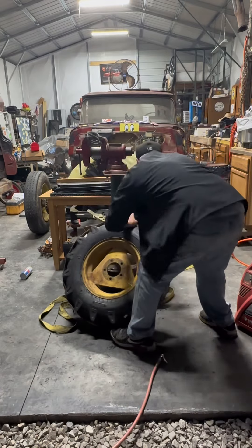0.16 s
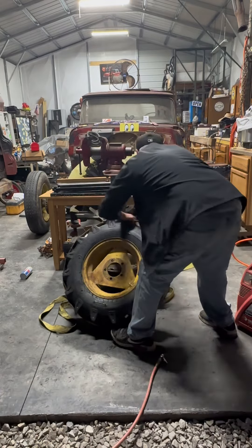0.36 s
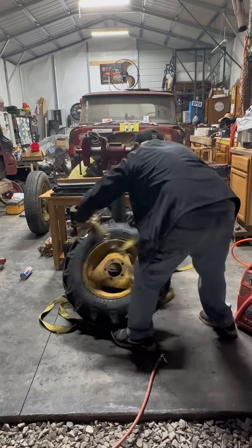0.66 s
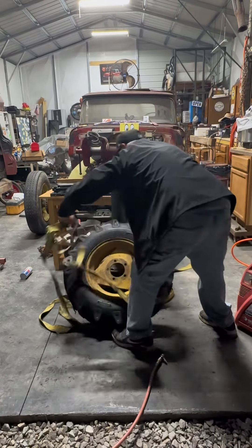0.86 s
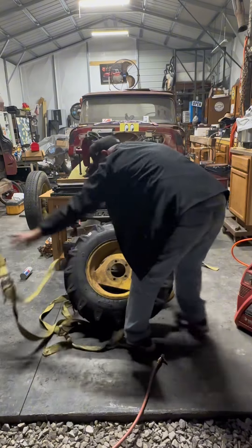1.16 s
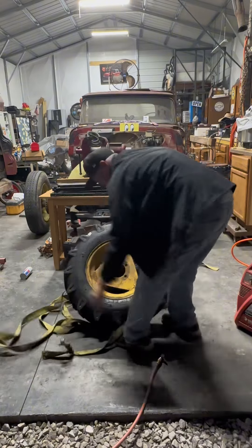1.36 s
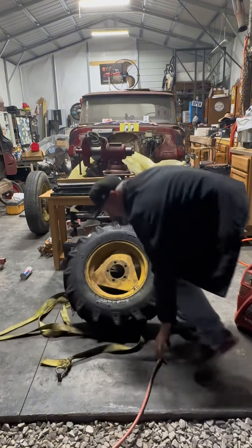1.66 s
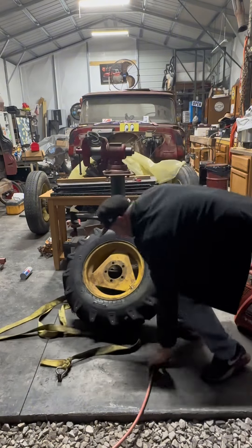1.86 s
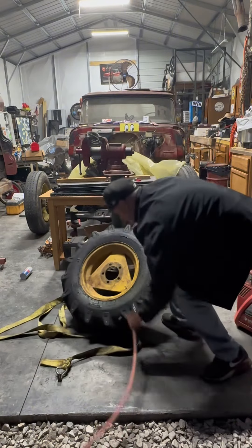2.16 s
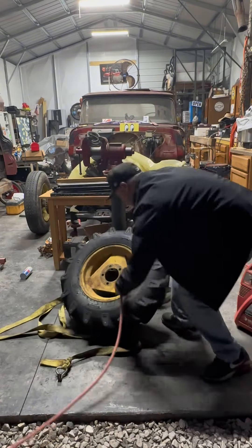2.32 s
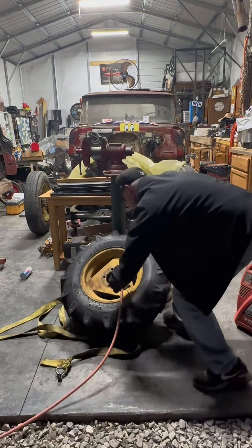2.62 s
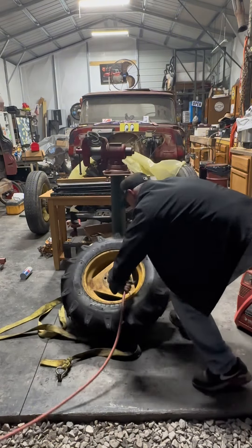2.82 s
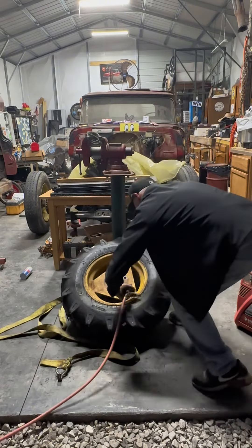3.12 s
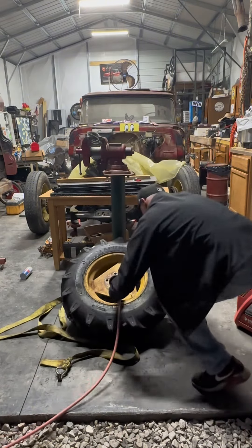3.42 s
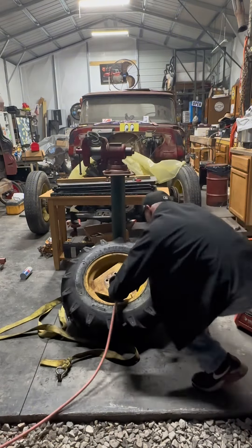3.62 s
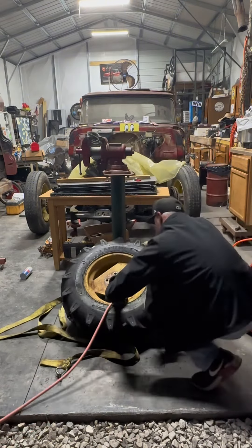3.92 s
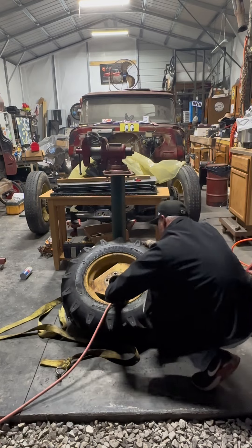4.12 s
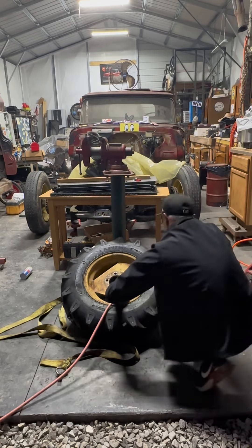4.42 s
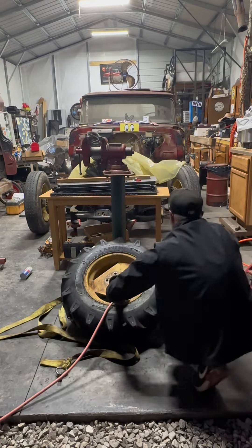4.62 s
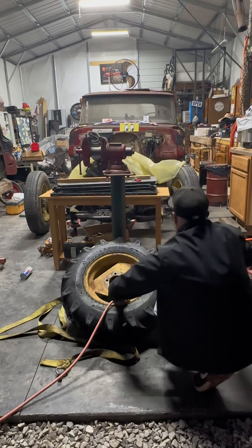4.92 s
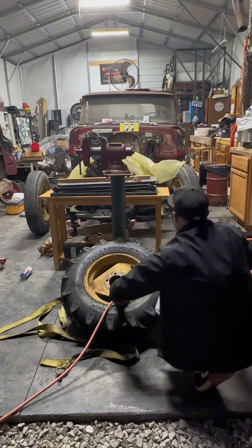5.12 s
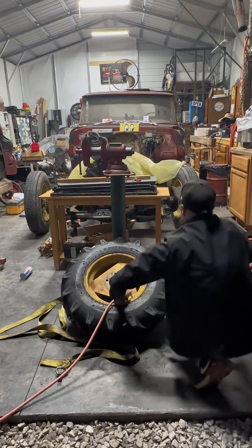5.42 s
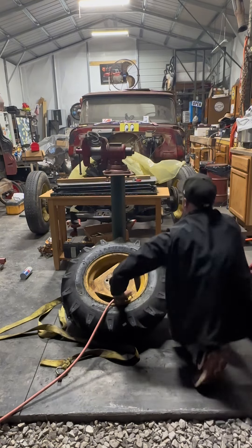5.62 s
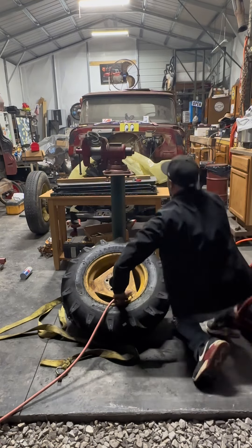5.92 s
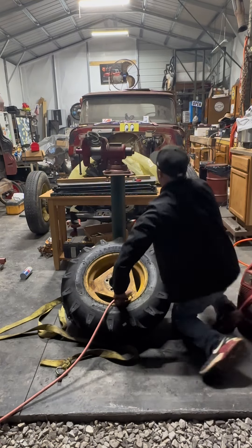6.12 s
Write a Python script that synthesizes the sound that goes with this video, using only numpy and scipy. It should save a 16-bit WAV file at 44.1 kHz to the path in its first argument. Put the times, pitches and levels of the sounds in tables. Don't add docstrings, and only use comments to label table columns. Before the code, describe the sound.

Compressed air hisses from an open hose as strap hardware clinks on concrete, then it puffs, blasts into a tractor tire and seals to near silence.

```python
import sys
import numpy as np
from scipy import signal
from scipy.fft import rfft, irfft, next_fast_len
from scipy.io import wavfile
from scipy.ndimage import uniform_filter1d

SR = 44100
rng = np.random.default_rng(int(sys.argv[2]) if len(sys.argv) > 2 else 0)


def transcribe(signal):
    frames = np.atleast_2d(signal).T
    limited = np.clip(frames, -1, 1)
    pcm = np.round(limited * 32767).astype(np.int16)
    wavfile.write(sys.argv[1], SR, pcm)


def field_ratio(decibels):
    return 10 ** (np.asarray(decibels, dtype=float) / 20)


N = 276507
T = np.arange(N) / SR
HZ = np.fft.rfftfreq(N, 1 / SR)

# time in seconds, jet level in dB.
LEAK = [(0, -27.5), (.6, -28), (.78, -30), (1.2, -29), (1.64, -33), (1.84, -29.5), (2.15, -31), (2.3, -31),
        (3.35, -34), (4.2, -34.5)]
# peak time in seconds, jet level in dB, eddy level in dB.
PUFFS = [
    (2.9, -28, -34.5),
    (3.005, -26.5, -32),
]
# time in seconds, jet level in dB.
BLAST = [(3.42, -43), (3.5, -29.5), (3.6, -23), (3.65, -22.5), (3.74, -19.5), (3.8, -28), (3.9, -26.5),
         (3.96, -28.5), (4.19, -26.5)]
# time in seconds, jet level in dB.
SEEP = [(4.2, -46), (4.7, -45), (4.9, -42.5), (5.05, -46), (5.64, -44), (5.725, -42), (5.74, -40),
        (5.95, -42), (6.3, -43)]
# frequency in Hz, density in dB per Hz.
LEAK_TONE = [(300, -12.5), (700, -18.5), (1500, -11.5), (3000, -10), (5000, -8), (6400, -0.5), (7150, 3),
             (7900, -1), (9000, 4), (10500, 3), (13000, -2.5), (15800, 4)]
BLAST_TONE = [(300, -34), (700, -21), (1000, -11.5), (2300, -10.5), (3300, -17), (4300, -13.5),
              (5300, -11.5), (6400, -4.5), (7300, -3), (7900, -6.5), (8800, 0), (12000, -5), (15800, -13)]
SEEP_TONE = [(300, -48), (900, -12.5), (2000, -7), (3300, -15.5), (4900, -13.5), (5600, -16.5),
             (6500, -6.5), (7400, -13.5), (8500, -11.5), (11000, 1.5), (15800, 0)]
# start in seconds, end in seconds, level in dB, first pitch in Hz,
# glide in Hz per second.
HOLLOWS = [
    (1.9, 2.25, -43.5, 3954, 1200),
    (3.5, 3.75, -36, 4200, 4500),
]
HOLLOW_Q = [11, 3]
# delay in seconds, level in dB.
BOUNCES = [(.0017, -18), (.0041, -20.5), (.0093, -15), (.017, -17.5)]

# start in seconds, crack peak in dB, crack centre in Hz,
# hook ring in dB, lever ring in dB.
CLINKS = [(0.7145, -2, 8000, -32, -32), (0.7173, -1.5, 7100, -27, -40), (0.7297, -29, 6550, -28, -28),
          (1.0346, -1.5, 6260, -34, -22), (1.261, -2, 7400, -26.5, -30), (1.3484, -2, 9450, -25, -30),
          (1.3581, -20, 7420, -27, -30), (1.377, -6.5, 7750, -23, -27), (1.426, -11, 8100, -32, -31)]
# start in seconds, crack peak in dB, crack centre in Hz,
# lever ring in dB.
CLACKS = [(0.5631, -14.5, 3900, -40), (0.6975, -8, 5000, -44), (1.274, -8.5, 5200, -32),
          (1.487, -13, 6000, -21), (1.5947, -26, 6000, -30), (1.6486, -21, 5880, -31),
          (4.3096, -24, 5000, -46)]
# pitch in Hz, level in dB, 60 dB decay in seconds.
HOOK = [(5830, 6, .18), (6250, 1, .1), (7950, -2, .06), (9350, -4, .06)]
LEVER = [(3235, 0.5, 0.057), (7460, 5, 0.024), (4580, -6, .05)]
# start in seconds, peak in dB, pitch in Hz, 60 dB
# decay in seconds.
PINGS = [(0.557, -42, 1064, 0.22), (.564, -34.5, 3870, 0.33), (.668, -15.5, 1450, 0.04),
         (0.671, -16.5, 2575, 0.053), (.716, -28.5, 2534, 0.42), (.716, -10, 10430, 0.06),
         (1.037, -21, 2790, .12), (1.04, -28, 2765, .45), (1.035, -22, 5790, .25), (1.035, -24, 6900, .07),
         (1.035, -26, 9600, .07), (1.272, -24, 5050, .05), (1.35, -27, 9900, .25), (1.376, -26, 5050, .04),
         (1.485, -16.5, 2770, 0.035), (1.588, -29, 2780, 0.09), (1.649, -29.5, 2657, 0.6),
         (5.735, -43, 2870, .15)]
TUMBLE_HZ = [2546, 3100, 5810, 6170]
# peak time in seconds, mode number,
# level in dB, rise in seconds, 60 dB decay in seconds.
TURNS = [(1.362, 0, -17, .018, 0.23), (1.388, 0, -22.5, .03, 0.068), (1.43, 0, -36, 0.029, 0.43),
         (1.47, 0, -34, 0.042, 0.26), (1.535, 0, -22, 0.042, .33), (1.63, 0, -40, 0.053, 0.47),
         (1.81, 0, -43, 0.056, 0.29), (1.36, 1, -32, .02, .25), (1.49, 1, -45, .03, .3),
         (1.57, 1, -39, 0.071, 0.65), (1.36, 2, -13.5, 0.0078, 0.088), (1, 2, -38, .03, .2),
         (1.36, 3, -22, 0.018, .1), (1.525, 3, -26.5, .03, .4), (1.658, 3, -24, 0.041, 0.35)]

# start in seconds, peak in dB, centre in Hz,
# 60 dB decay in seconds.
SCUFFS = [(0.562, -40, 1060, .13), (0.666, -18, 1310, .12), (0.689, -24, 1230, 0.11),
          (1.035, -26.5, 754, 0.3), (1.351, -26.5, 533, 0.22), (2.875, -29.5, 860, 0.33),
          (2.94, -35, 1100, 0.22), (3.005, -26.5, 1400, .16), (3.22, -35, 1320, 0.52),
          (4.199, -31, 1030, 0.077), (4.308, -35, 1800, 0.096), (4.507, -29.5, 565, 0.16),
          (4.731, -31.5, 600, .13), (4.75, -37.5, 1050, .2), (4.86, -42.5, 1800, 0.27),
          (5.003, -38.5, 1380, .2), (5.069, -43, 1290, 0.13), (5.66, -36.5, 796, 0.17),
          (5.732, -35.5, 2100, .2), (5.775, -39, 2100, .12)]
# start in seconds, peak in dB, ring in Hz, 60 dB decay in seconds.
BUMPS = [(0.558, -29, 94, 0.16), (1.04, -26, 151, 0.37), (1.268, -27, 104, 0.22), (1.37, -24.5, 131, 0.087),
         (3.015, -12.5, 238, 0.095), (3.05, -27, 158, 0.31), (4.508, -22, 428, 0.077),
         (4.517, -23.5, 175, 0.14), (4.739, -29, 129, 0.19), (5.669, -31, 96.9, 0.14),
         (6.22, -31, 95, 0.13)]
# start in seconds, end in seconds, first pitch in Hz,
# last pitch in Hz, level in dB.
CREAKS = [
    (.005, 0.141, 345.6, 240.3, -35.5),
    (2.04, 2.118, 360, 251, -39.5),
    (2.29, 2.358, 130.3, 142.7, -36.5),
    (2.94, 2.989, 216, 147, -35),
]

# pitch in Hz, wavering width in Hz, level in dB.
HUM = [(86.7, 7.3, -47.5), (120.6, 13, -53), (173.6, 11.3, -57.5)]
# frequency in Hz, density in dB per Hz.
SHED = [(18, -42), (30, -6), (91, -8.5), (146, -11.5), (178, -10.5), (276, -19.5), (310, -16), (555, -27.5),
        (900, -24), (1170, -60), (1980, -120)]
# frequency in Hz, side minus mid in dB.
DIFFUSE = [(30, -27), (90, -29), (200, -20.5), (400, -11), (750, -5), (1250, -12.5), (1500, -22.5),
           (2200, -15.5), (2800, -3), (3700, -9), (4900, -4.5), (5400, -16.5), (7500, -18), (10000, -30)]
# frequency in Hz, difference in cycles.
PORT_PHASE = [(0, 0), (7300, .025), (8300, .22), (10100, .35), (10800, .46), (13500, .53), (14500, .63),
              (15900, .77)]

LEAK_EDDY_DB, LEAK_TOP_DB = -12, 1
SEEP_EDDY_DB, SEEP_TOP_DB = -9.5, -14.5
SLIDE_S, SLIDE_RISE_S, SLIDE_DB, SETTLE_DB, SETTLE_S = 3.46, 0.11, -30, -8.5, 0.24
SEAL_S, SEAL_DB_PER_S, SEAL_EDDY_DB_PER_S = 4.193, 150, 260
UNSHADED_S, UNSHADED_DB = 5.7, 9.5
PUFF_RISE_S, PUFF_T60_S = 0.075, 0.34
HOLLOW_FADE_DB_PER_S = 200
CRACK_T60_S, DAMPED_HOOK_DB, SNAP, SNAP_S = .028, -48, 1.6, .0004
STRAP_TOP_HZ = 10800
TOSS_S, STRAP_LAG_S = 1.347, 32e-6
TWIN_DETUNE_HZ, TWIN_DB, TWIN_SMEAR_S = -4.2, 0, .04
SCUFF_OCTAVES, SCUFF_RISE_S, NARROWING = 1, .005, .5
BUZZY_HZ, PURER_DB_PER_HZ = 95, .11
SHED_DB = -38.5
ROOM_T60_S, ROOM_DB = .5, -10
TOP_HZ = 15680


def unit(x):
    return x / np.sqrt(np.mean(x ** 2))


def shape(points, at_hz=HZ):
    hz, db = np.transpose(points)
    return field_ratio(np.interp(np.log(at_hz + 1), np.log(hz), db))


def noise(gain):
    return irfft(rfft(rng.standard_normal(N)) * gain, N)


def bell(hz, octaves):
    return np.exp(-.5 * (np.log2((HZ + 1) / hz) / octaves) ** 2)


def walk(rate):
    hold = int(SR / rate)
    steps = np.repeat(rng.standard_normal(N // hold + 1), hold)
    return 1.3 * uniform_filter1d(uniform_filter1d(steps, hold), hold)[:N]


def curve(table):
    return np.interp(T, *np.transpose(table), left=-120)


def swell(s, rise, db_per_s):
    climb = 30 * (T - s) / max(rise, .002)
    return np.maximum(np.where(T < s, climb, db_per_s * (s - T)), -150)


def decay(t, t60):
    return 1000 ** (-t / t60)


def add(out, s, sound):
    i = max(int(s * SR), 0)
    out[i:i + len(sound)] += sound[:N - i]


def chuck():
    sealed = np.maximum(T - SEAL_S, 0)
    leak_db = curve(LEAK) - SEAL_DB_PER_S * sealed
    leak = jet(leak_db, leak_db + LEAK_EDDY_DB, LEAK_TOP_DB, LEAK_TONE, 0.73, 12)

    seep_db = curve(SEEP)
    unshaded = UNSHADED_DB * np.clip((T - UNSHADED_S) / .1 + .5, 0, 1)
    seep = jet(seep_db, seep_db + SEEP_EDDY_DB, SEEP_TOP_DB + unshaded, SEEP_TONE, 0.52, 12)

    puff_levels = []
    for column, lead in [(1, 0.0038), (2, 0.0082)]:
        each = [row[column] + swell(row[0] - lead, PUFF_RISE_S, 60 / PUFF_T60_S) for row in PUFFS]
        puff_levels.append(np.max(each, axis=0))
    puffs = jet(*puff_levels, -2, BLAST_TONE, .7, 16)

    settle = SETTLE_DB * (1 - np.exp(-np.maximum(T - SLIDE_S, 0) / SETTLE_S))
    eddy_db = SLIDE_DB + swell(SLIDE_S, SLIDE_RISE_S, 0) + 2.3 * walk(14) + settle
    blast_db = curve(BLAST) - SEAL_DB_PER_S * sealed
    blast = jet(blast_db, eddy_db - SEAL_EDDY_DB_PER_S * sealed, -1.0, BLAST_TONE, 0.75, 20)
    return leak + seep + hollows() + puffs + blast


def jet(level_db, low_db, top_db, tone, flutter_db, rate):
    colour, shared, out = shape(tone), walk(3 * rate), 0
    core = noise(colour * (HZ > 5500) * (HZ < 9500)).std()
    low = noise(colour * (HZ > 900) * (HZ < 4000)).std()
    for hz in 250 * 2 ** np.arange(0, 6.5, .5):
        band = noise(colour * bell(hz, .25))
        if hz < 4500:
            gain = field_ratio(low_db) / low
        else:
            gain = field_ratio(level_db + top_db * (hz > 10000)) / core
        flicker_db = flutter_db * (walk(rate) + 1.42 * shared) + 2.0 * walk(9) * (hz > 10000)
        out = out + band * gain * field_ratio(flicker_db)
    return out


def hollows():
    out = 0
    for (start, end, db, hz, glide), q in zip(HOLLOWS, HOLLOW_Q):
        db = db + swell(start, 0.32 * (end - start), 0) - HOLLOW_FADE_DB_PER_S * np.maximum(T - end, 0)
        phase = 2 * np.pi * np.cumsum(np.clip(hz + glide * (T - start), 500, 8000)) / SR
        slow_a, slow_b = (unit(noise(np.exp(-.5 * (HZ * q / hz) ** 2))) for _ in range(2))
        out = out + field_ratio(db + 1.2 * walk(24.85)) * (slow_a * np.cos(phase) + slow_b * np.sin(phase))
    return out


def hardware():
    out, t = np.zeros(N), T[:SR // 2]
    dull = [(s, db, hz, DAMPED_HOOK_DB, lever_db) for s, db, hz, lever_db in CLACKS]
    for s, db, hz, hook_db, lever_db in CLINKS + dull:
        crack = unit(noise(bell(hz, 0.7)))[:len(t)] * decay(t, CRACK_T60_S)
        crack += SNAP * np.cos(2 * np.pi * hz * t) * np.exp(-(t / SNAP_S - 1) ** 2)
        add(out, s, field_ratio(db - 9) * crack)
        modes = [(f, g + hook_db, d) for f, g, d in HOOK]
        modes += [(f, g + lever_db, d) for f, g, d in LEVER]
        for f, g, t60 in modes:
            uneven_db = 1.9 * (rng.random() - 1.5)
            add(out, s, field_ratio(g + uneven_db) * np.sin(2 * np.pi * f * t) * decay(t, t60))
    for s, db, hz, t60 in PINGS:
        add(out, s, field_ratio(db) * np.sin(2 * np.pi * hz * t) * np.minimum(t / 0.0025, 1) * decay(t, t60))
    return signal.sosfilt(signal.butter(6, STRAP_TOP_HZ, fs=SR, output="sos"), out)


def tumble():
    out = side = 0
    for k, hz in enumerate(TUMBLE_HZ):
        size = sum(field_ratio(db + swell(s, rise, 60 / max(t60, .02)))
                   for s, mode, db, rise, t60 in TURNS if round(mode) == k)
        size = np.sqrt(2) * size * (T > TOSS_S)
        phase = 2 * np.pi * hz * T + 0.94 * walk(50.1)
        out = out + size * field_ratio(1.3 * walk(60.1)) * np.sin(phase)
        if k == 0:
            smear = int(TWIN_SMEAR_S * SR)
            slow = uniform_filter1d(size, int(2 * TWIN_SMEAR_S * SR), origin=smear - 1)
            twin_phase = phase + 2 * np.pi * TWIN_DETUNE_HZ * (T - TOSS_S - .02)
            side = -field_ratio(TWIN_DB) * np.maximum(size, slow) * np.cos(twin_phase)
    return out, side


def feet():
    out, t = np.zeros(N), T[:SR // 2]
    for s, db, hz, t60 in SCUFFS:
        octaves = SCUFF_OCTAVES * (800 / hz) ** NARROWING
        grit = unit(noise(bell(hz, octaves))) * field_ratio(1.45 * walk(188))
        envelope = np.minimum(t / SCUFF_RISE_S, 1) * decay(t, max(t60, .03))
        add(out, s - SCUFF_RISE_S / 2, field_ratio(db - 3.5) * grit[:len(t)] * envelope)
    for s, db, hz, t60 in BUMPS:
        body = np.sin(2 * np.pi * hz * (t + 0.003 * (1 - np.exp(-t / 0.0019))))
        body += 0.87 * unit(noise(bell(hz, 0.98)))[:len(t)]
        add(out, s, field_ratio(db - 7) * body * np.minimum(t / 0.0075, 1) * decay(t, max(t60, .02)))
    for start, end, first_hz, last_hz, db in CREAKS:
        slope_db = PURER_DB_PER_HZ * (BUZZY_HZ - first_hz)
        u = np.linspace(0, 1, int((end - start) * SR))
        phase = 2 * np.pi * np.cumsum(first_hz + (last_hz - first_hz) * u) / SR
        slips = sum(field_ratio(slope_db * k) * np.cos((k + 1) * phase) for k in range(5))
        add(out, start, field_ratio(db) * slips * np.sqrt(np.sin(np.pi * u) + 1e-9))
    return out


def shed():
    hum = sum(field_ratio(db + 2.2 * walk(2 * width)) * np.sin(2 * np.pi * hz * T + 0.6 * walk(width))
              for hz, width, db in HUM)
    rumble = field_ratio(SHED_DB - 7 + 0.9 * walk(4)) * unit(noise(shape(SHED)))
    return np.sqrt(2) * hum + rumble


def ports(sound, cycles):
    size = next_fast_len(N + 8192)
    hz, whole = np.fft.rfftfreq(size, 1 / SR), rfft(sound, size)
    burst = rng.standard_normal(8000) * decay(T[:8000], .18)
    scatter = rfft(unit(burst) / np.sqrt(8000), size)
    side = whole * scatter * shape(DIFFUSE, hz)
    lag = np.exp(1j * np.pi * np.interp(hz, *np.transpose(cycles)))
    return np.array([irfft(whole * lag + side, size)[:N], irfft(whole / lag - side, size)[:N]])


def scene():
    t = T[:SR]
    tail = unit(rng.standard_normal(SR) * decay(t, ROOM_T60_S) * (t > .012)) / np.sqrt(SR)
    metal, steps = (x + field_ratio(ROOM_DB) * signal.fftconvolve(x, tail)[:N] for x in (hardware(), feet()))
    ring, twin = tumble()
    metal = metal + ring
    air = chuck()
    air = 1.066 * (air + sum(field_ratio(db) * np.roll(air, int(s * SR)) for s, db in BOUNCES))
    keep = np.exp(-1 / (.11 * SR))
    ringing = (metal + steps) ** 2
    for _ in range(2):
        ringing = signal.lfilter([1 - keep], [1, -keep], ringing)
    rest = steps + air + shed() / np.sqrt(1 + ringing / field_ratio(-29) ** 2)
    aside = [(0, 0), (SR / 2, -STRAP_LAG_S * SR / 2)]
    return ports(rest, PORT_PHASE) + ports(metal, aside) + np.array([twin, -twin])


def top_cut(x):
    return signal.sosfilt(signal.butter(12, 17110, fs=SR, output="sos"), x)


def record(dry):
    x = signal.sosfilt(signal.butter(8, 38, "high", fs=SR, output="sos"), np.tanh(dry))
    x = signal.sosfilt(signal.ellip(10, .2, 80, TOP_HZ, fs=SR, output="sos"), x)
    return top_cut(x)


dry = scene()
out = record(dry)
transcribe(out)
```